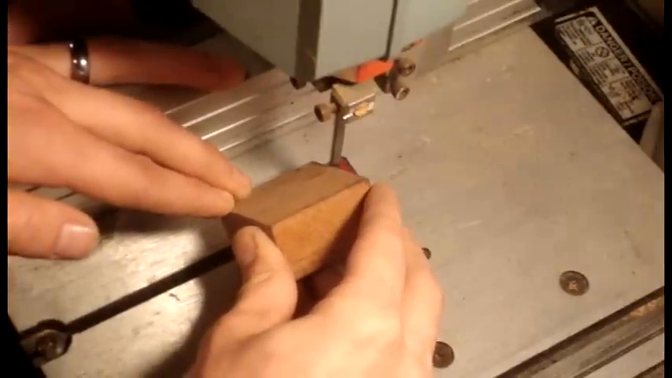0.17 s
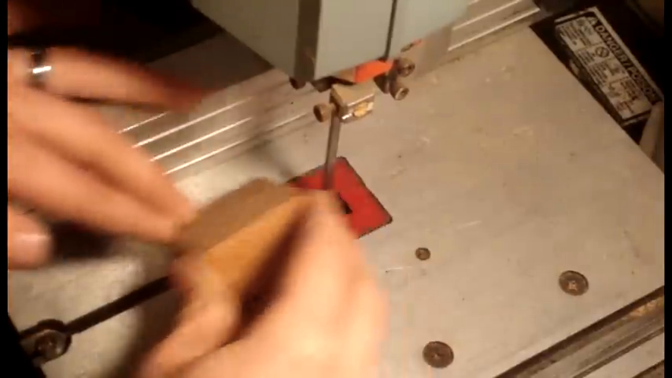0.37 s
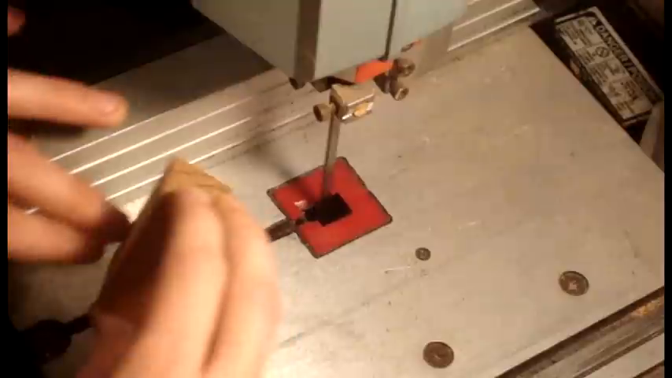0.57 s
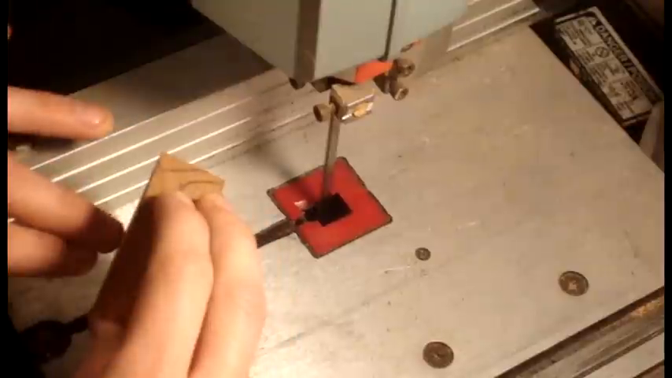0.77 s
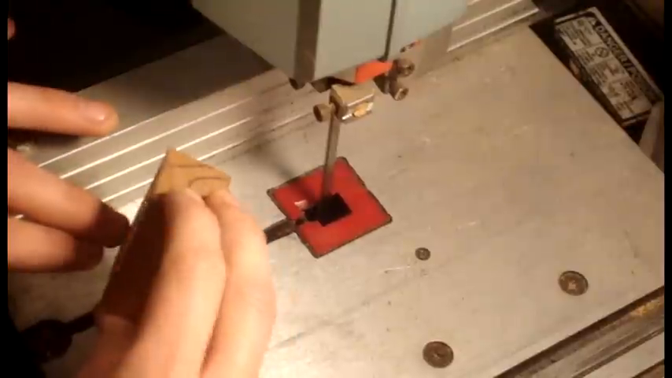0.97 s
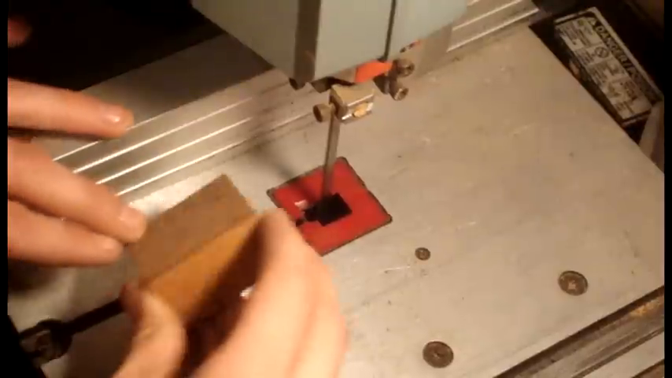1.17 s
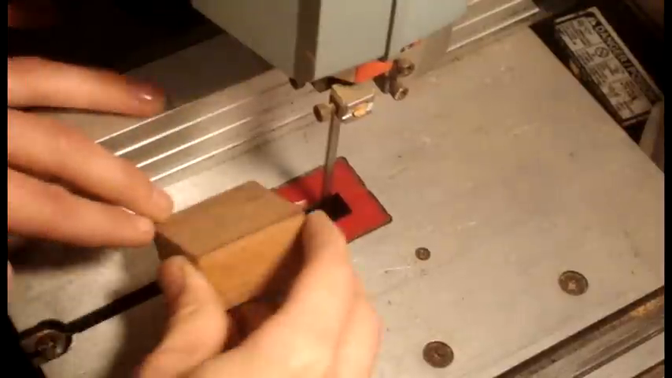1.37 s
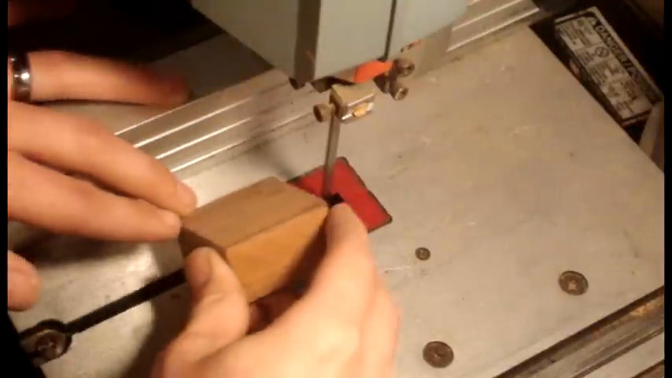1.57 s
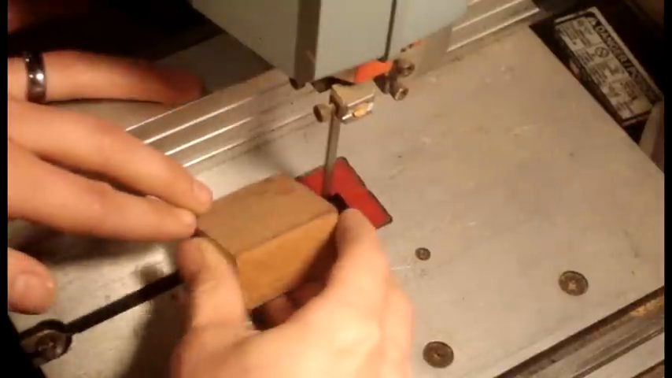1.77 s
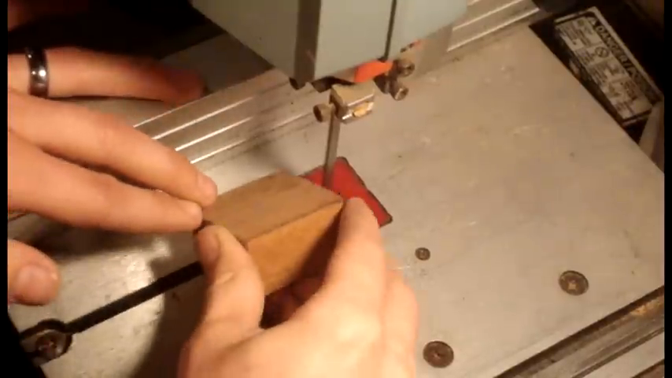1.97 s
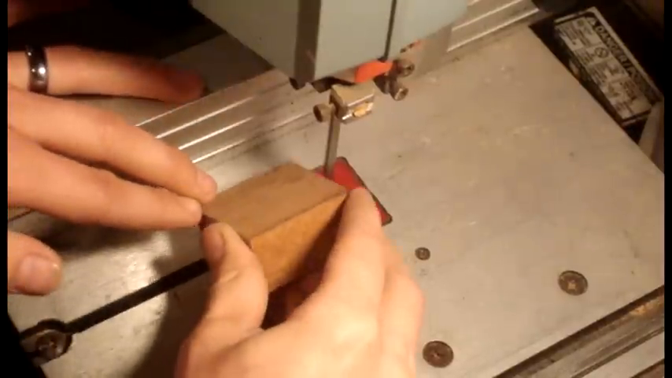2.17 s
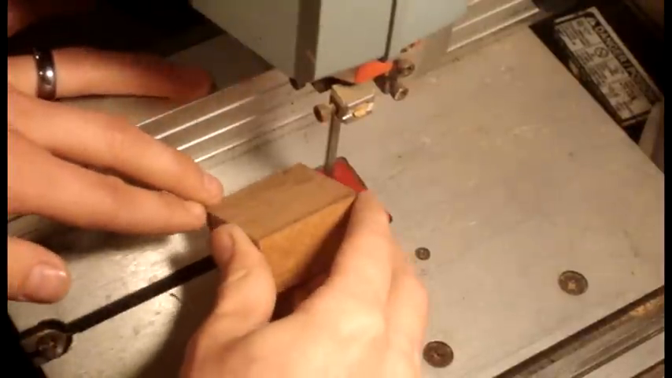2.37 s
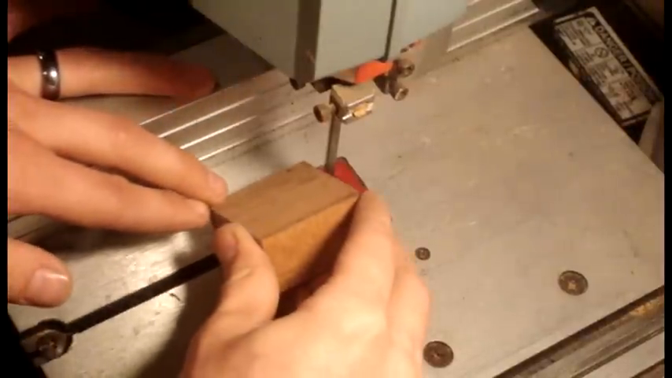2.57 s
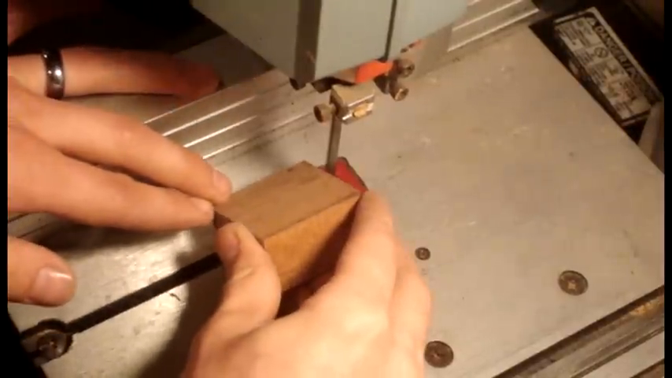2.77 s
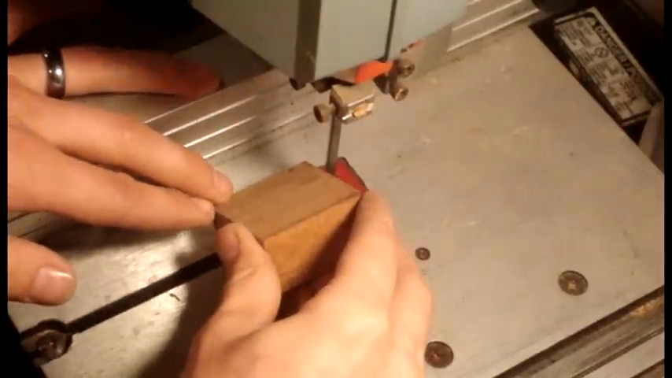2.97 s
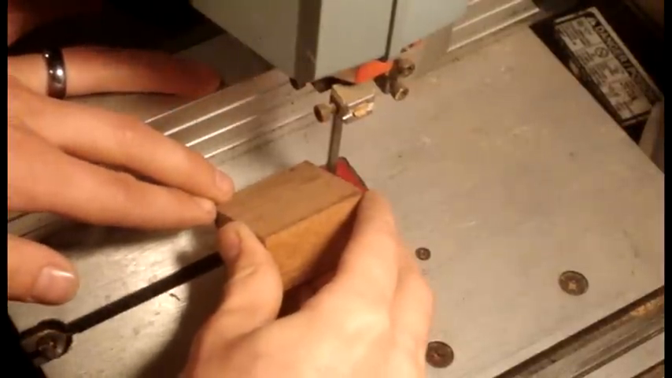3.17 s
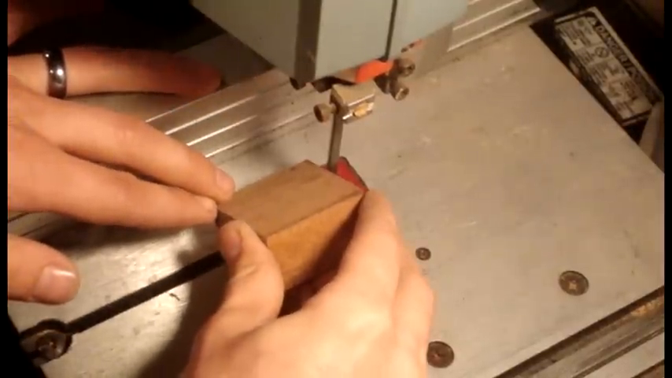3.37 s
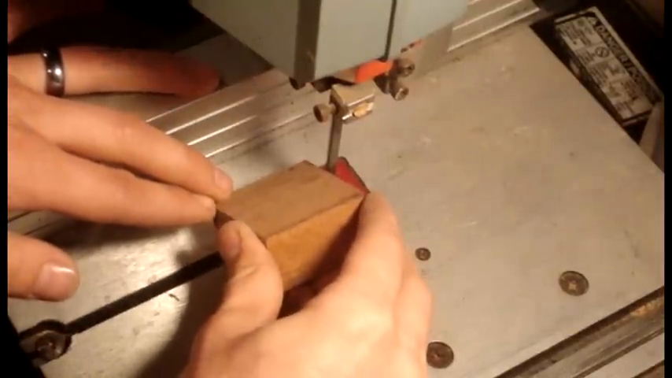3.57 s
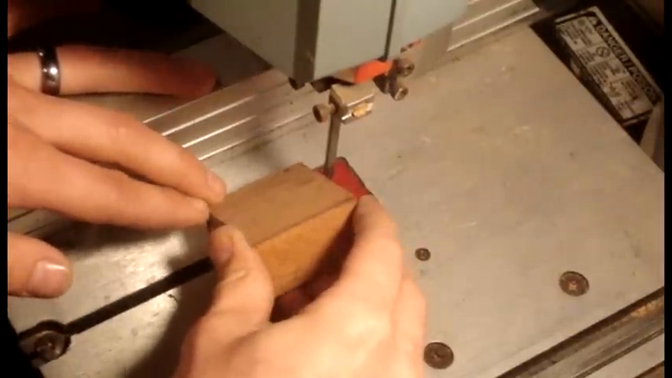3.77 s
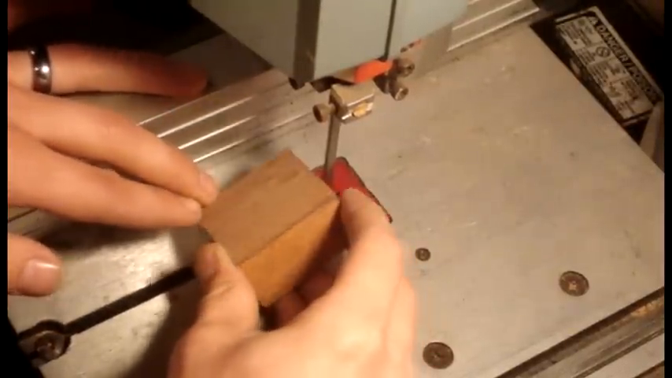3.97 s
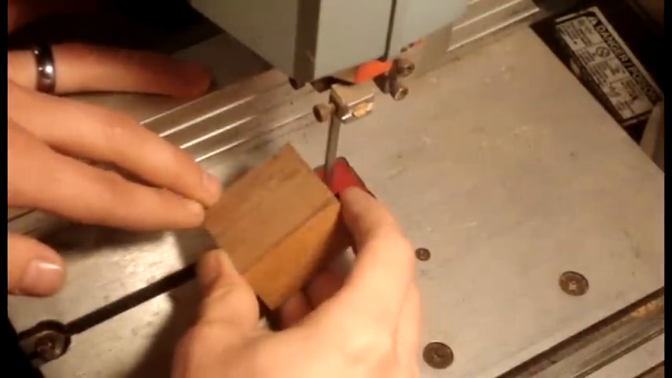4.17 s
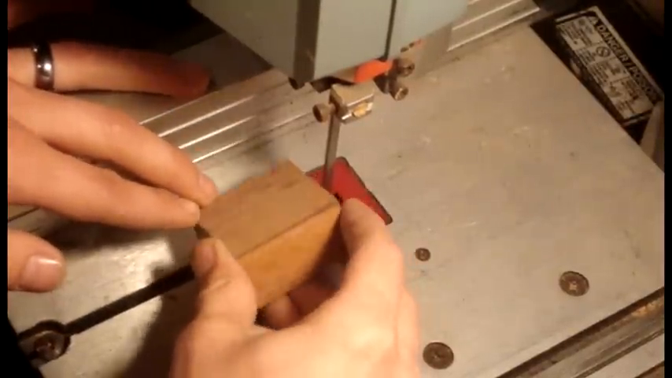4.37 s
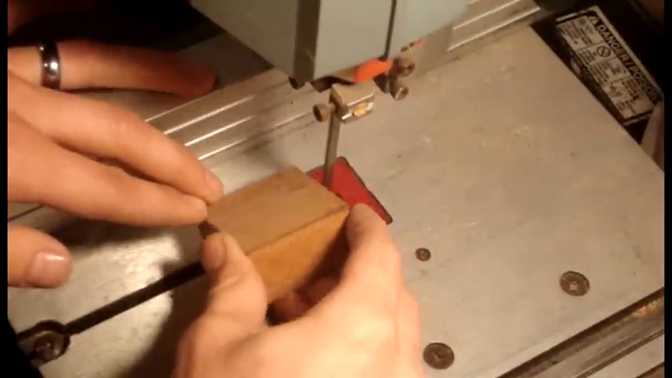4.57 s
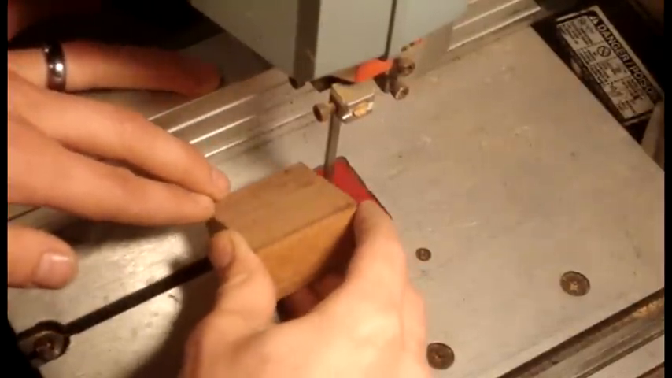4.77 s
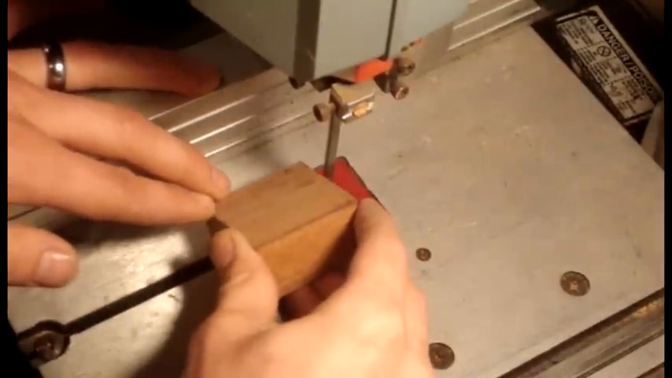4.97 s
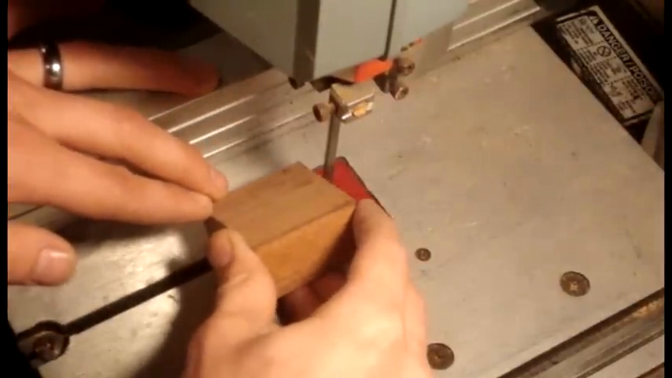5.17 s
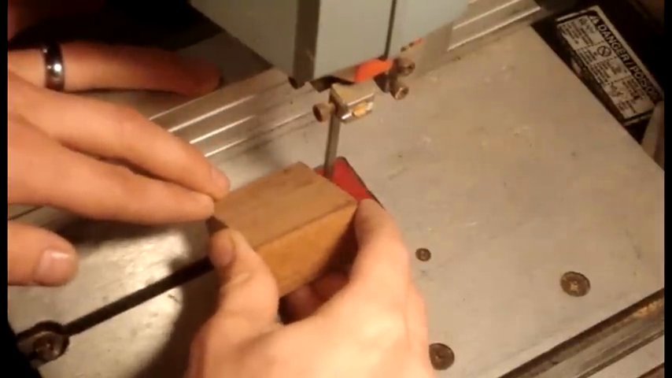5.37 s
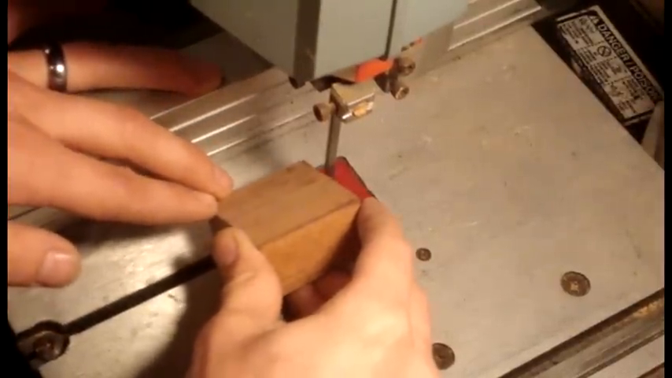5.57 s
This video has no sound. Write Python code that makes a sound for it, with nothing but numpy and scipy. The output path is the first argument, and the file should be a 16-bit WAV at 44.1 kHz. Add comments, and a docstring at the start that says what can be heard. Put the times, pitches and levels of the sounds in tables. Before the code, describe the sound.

A small bandsaw runs with a rattling whine, rasping and singing as it bites a wooden block in short cuts.

```python
"""Small bandsaw in a workshop.

Close up, on a mono camera microphone. The drive knocks once a turn and shakes the steel frame under
a whine of bearings and fan. Now and then the blade bites a wooden block: the teeth sing, the chips
rasp and the block rings. Between cuts the block knocks twice on the table."""
import sys
import numpy as np
from scipy import signal
from scipy.fft import rfft, irfft, next_fast_len
from scipy.io import wavfile
from scipy.ndimage import uniform_filter1d, map_coordinates

SR = 44100
rng = np.random.default_rng(int(sys.argv[2]) if len(sys.argv) > 2 else 0)


def put_to_file(sound):
    """Save the sound as 16-bit audio at rate SR, in the file named by the first command-line argument."""
    columns = np.atleast_2d(sound).T  # one column per channel
    safe = np.clip(columns, -1, 1)
    whole_steps = np.round(safe * 32767)
    wavfile.write(sys.argv[1], SR, whole_steps.astype(np.int16))


N = 248503
T = np.arange(N) / SR
TURN_HZ = 19.504  # turns of the drive a second


def amp(db):
    """Gain of a level in dB."""
    return 10 ** (np.asarray(db) / 20)


def unit(x):
    """x at rms 1."""
    return x / np.sqrt(np.mean(x ** 2) + 1e-20)


def along(points, hz):
    """(frequency, value) points interpolated on a log axis."""
    freqs, values = np.transpose(points)
    return np.interp(np.log(hz + 1), np.log(freqs + 1), values)


def curves(rows):
    """One value per sample for each column after the time."""
    times, *columns = np.transpose(rows)
    return np.array([np.interp(T, times, column) for column in columns])


def wobble(rate):
    """A smooth random curve, rate knots a second."""
    return map_coordinates(rng.standard_normal(int(N * rate / SR) + 4), [T * rate])


def pulse(at, db, again_db=0):
    """A gain that peaks once a turn, at a phase in turns; again_db adds a ripple twice a turn."""
    turn = 2 * np.pi * (TURN_HZ * T - at)
    return amp(db * np.cos(turn) + again_db * np.cos(2 * turn))


def swell(start, length):
    """A gain that rises, holds and fades; one starting at 0 s is already full."""
    edge_s = 0.13 * length
    rise = np.clip((T - start) / edge_s, 0, 1) if start > 0 else 1
    return rise * np.clip((start + length - T) / edge_s, 0, 1)


def filtered(x, response):
    """x through a filter given as gain against frequency."""
    size = next_fast_len(N + SR // 2)
    return irfft(rfft(x, size) * response(np.fft.rfftfreq(size, 1 / SR)), size)[..., :N]


def noise(response, patchy_db):
    """Filtered noise at rms 1, its gain varying in patches of time and frequency."""
    spectra = signal.stft(rng.standard_normal(N), nperseg=512)[2]
    patches = uniform_filter1d(rng.standard_normal(spectra.shape), size=5, axis=0)
    patches = uniform_filter1d(patches, size=8, axis=1)
    patchy = signal.istft(spectra * amp(patchy_db * unit(patches)), nperseg=512)[1][:N]
    return unit(filtered(patchy, response))


def peak(hz, half_width_hz, slope=2):
    """A response with a single peak."""
    return lambda f: 1 / (1 + ((f - hz) / half_width_hz) ** slope)


def idle_levels():
    """Rumble, frame and hiss in dB: the idling saw sounds lower around hard cuts and swells back."""
    # sinking of the idle sound: (time [s], level [dB])
    sinking = [(0, -15.5), (.3, -9.5), (.55, -8.5), (1.2, -3.5), (1.9, -2), (2.6, -1), (3.15, -1),
               (3.25, 0.5), (3.76, -5), (4.1, -2.5), (4.6, -1.5), (5.64, 0)]
    # rumble, frame and hiss: (base level [dB], depth of sinking [factor])
    parts = [(-40.5, 1.43), (-37.5, 1.06), (-42, 0.69)]
    # a hard push stills the frame's low ring: (start [s], length [s], level change [dB])
    stilled = (3.17, 0.55, -4.5)
    sink_db, = curves(sinking)
    rumble_db, frame_db, hiss_db = [db + depth * sink_db + 0.5 * wobble(7.9) for db, depth in parts]
    start, length, dip_db = stilled
    return rumble_db + dip_db * swell(start, length), frame_db, hiss_db


def frame_response(f):
    """Gain of the steel frame at f Hz: resonances over a broad bed."""
    # modes of frame, covers and table: (frequency [Hz], width [Hz], relative level [dB])
    modes = [(247, 55, -11.5), (335, 13, -6.5), (375, 26, -2.5), (566, 40, -9), (717, 23, -9.5),
             (853.5, 30, -8.5), (1034, 51, -6.5), (1243, 120, -12.5), (1460, 66, -11), (1540, 25, -11.5),
             (2536, 120, -10.5), (2785, 61, -7), (2985, 114, -11.5), (3842, 84, -14.5), (4836, 196, -15),
             (5330, 270, -25), (6136, 190, -21.5), (7630, 43, -20.5), (8300, 59, -20.5), (8680, 150, -20.5)]
    # broad noise between the modes: (frequency [Hz], relative density [dB])
    bed = [(18, -73), (30, -26), (281, -26.5), (358, 5.5), (445, -19), (1040, -13.5), (1150, -27.5),
           (1540, -3), (1960, -13.5), (2760, -1.5), (3350, -22.5), (4820, -17.5), (10000, -26),
           (13000, -45), (22000, -120)]
    bed_db = along(bed, f)
    mode_power = sum(amp(2 * db) * (f * width) ** 2 / ((hz * hz - f * f) ** 2 + (f * width) ** 2)
                     for hz, width, db in modes)
    return np.sqrt(amp(2 * (bed_db - 13)) + mode_power * amp(np.minimum(bed_db + 18, 0)))


def frame(rumble_db, frame_db, hiss_db):
    """Bearing and blade noise, pulsing with the turn, sets the frame's resonances going."""
    # pulsing of the frame's midrange: (from [Hz], to [Hz], depth [dB], phase [turns])
    beats = [(450, 790, .5, .5), (790, 930, 2.5, .89), (930, 1130, 2.8, .49), (1130, 1350, 1.2, .7),
             (1350, 1700, 1.6, .53), (1700, 2250, .6, .47)]

    def band(lo, hi, patchy_db):
        return noise(lambda f: frame_response(f) * (f >= lo) * (f < hi), patchy_db)

    knock = pulse(-.2, db=2.5)
    chatter = pulse(.4, db=2.2, again_db=1.4) * amp(.7 * wobble(14))
    middle = band(450, 2250, patchy_db=1.1)
    beating = sum(pulse(at, db) * filtered(middle, lambda f: (f >= lo) * (f < hi))
                  for lo, hi, db, at in beats)
    flecks = pulse(.2, db=.2, again_db=.4) * amp(.8 * wobble(25))
    return (amp(rumble_db - 3.5) * knock * band(0, 450, patchy_db=-1.0)
            + amp(frame_db + 2.5) * beating
            + amp(frame_db - 3.5) * chatter * band(2250, 3300, patchy_db=1.5)
            + amp(hiss_db + 2.5) * flecks * band(3285, SR, patchy_db=0.97))


def drive(rumble_db, frame_db):
    """Tones locked to the turn; neighbours line up into one knock a turn."""
    # tones of the drive: (multiple of the turn, relative level [dB])
    orders = [(5, -63), (6, -31), (7, -29), (9, -32), (11, -24), (12, -33.5), (13, -42), (18, -10),
              (19, -15), (20, -13.5), (22, -37), (24, -26.5), (26, -15.5), (28, -14.5), (29, -27),
              (30, -13), (33, -24), (35, -21), (39, -37), (44, -24.5), (50, -26), (51, -21), (52, -11),
              (53, -16), (54, -5.5), (56, -30), (60, -36.5), (61, -24), (62, -42.5), (64, -34), (71, -23),
              (76, -18), (77, -14), (81, -22), (82, -21)]
    # where on the turn each band knocks: (upper edge [Hz], phase [turns])
    knocks = [(450, -.2), (650, -.1), (1200, .5), (1800, .57)]
    out = np.zeros(N)
    for k, db in orders:
        base_db = rumble_db + 6.5 if k * TURN_HZ < 450 else frame_db + 6.0
        at = next(turn for top_hz, turn in knocks if k * TURN_HZ < top_hz)
        phase = 2 * np.pi * k * (TURN_HZ * T - at)
        out += amp(base_db + db + .6 * wobble(6)) * np.cos(phase + .13 * wobble(4))
    return out


def whine(frame_db):
    """Bearings and fan whine at set pitches, wavering a little."""
    # bearing and fan tones: (frequency [Hz], level against the frame [dB])
    whines = [(239, -17.5), (344.5, -12.5), (838, -12.5), (1249, -13), (1399, -9.5), (1438.5, -30),
              (1579, -10.5), (2465.5, -11), (2779, -9), (2823, -12)]
    return sum(amp(frame_db + db + 2.2 * wobble(9)) * np.cos(2 * np.pi * hz * T + 1.3 * wobble(8))
               for hz, db in whines)


def block_groan():
    """The block groans in a low, rough band under a hard push."""
    # groans: (start [s], length [s], relative level [dB])
    groans = [(0.0, 0.099, -31), (2.636, 0.027, -19), (2.75, 0.13, -23), (3.225, 0.17, -26)]
    push = sum(amp(db) * swell(start, length) for start, length, db in groans)
    return 0.13 * push * noise(peak(560, 35), patchy_db=1.5)


def block_knocks():
    """The block hits the table: a crack and a short wooden ring."""
    # knocks: (time [s], relative level [dB])
    taps = [(1.593, -16), (5.1524, -21)]
    # modes of the block: (frequency [Hz], relative level [dB], time to fall 60 dB [s])
    modes = [(1050, -4, .06), (1290, -1, .07), (1500, -4, .05), (1800, -3, .05), (2070, -1, .075),
             (2450, -12, .03)]
    out = np.zeros(N)
    t = T[:SR // 5]
    attack = 1 - np.exp(-t / 0.002)
    for start, tap_db in taps:
        ring = sum(amp(db + rng.normal(0, 1.1) - 60 * t / t60) * np.sin(2 * np.pi * hz * t)
                   for hz, db, t60 in modes)
        crack = 0.4 * amp(-60 * t / 0.0058) * rng.standard_normal(len(t))
        out[round(start * SR):][:len(t)] += amp(tap_db - 10.5) * (ring + crack) * attack
    return out


def ringing():
    """Block and blade ring in narrow, unsteady tones, alone or against each other."""
    # rings: (start [s], length [s], first pitch [Hz], last pitch [Hz], level [dB], roughness [rad])
    rings = [(0.0, .022, 1278, 1278, -33.5, .5), (.028, .085, 1275, 1283, -36, .7),
             (.117, .05, 1283, 1275, -33.5, .5), (.165, .085, 1285, 1290, -43, .9),
             (.232, .064, 880, 660, -38, 1.1), (.288, .035, 700, 640, -43, 1.1),
             (.43, .27, 3340, 3342, -54, .6), (.28, .19, 4660, 4640, -50, 1.1),
             (1.35, 1.15, 4885, 4900, -51, 1.4), (2.68, .38, 708, 710, -39.5, .7),
             (2.89, .26, 352, 352, -40, .3), (3.16, .08, 4800, 4950, -41, 1.8),
             (3.35, .14, 4750, 4900, -42, 1.8), (3.0, .15, 2790, 2790, -42, .6),
             (3.185, .05, 2790, 2790, -39, .5), (3.51, .07, 2790, 2785, -40, .5),
             (3.35, .08, 2085, 2085, -38, .5), (3.37, .09, 3465, 3460, -41, .6),
             (3.145, .045, 360, 355, -39, .3), (3.15, .08, 740, 735, -37, 1.2),
             (3.215, .145, 545, 570, -37.5, .8), (3.23, .105, 700, 755, -33, 1.2),
             (3.32, .12, 735, 720, -40, 1.1), (3.44, .12, 1315, 1325, -40, .9),
             (3.465, .08, 1035, 1050, -36, .7)]
    out = np.zeros(N)
    for start, length, first_hz, last_hz, db, rough in rings:
        hz = np.interp(T, [start, start + length], [first_hz, last_hz])
        phase = 2 * np.pi * np.cumsum(hz) / SR
        gain = np.sqrt(2) * swell(start, length) * amp(db + 1.5 * rough * wobble(40))
        out += gain * np.cos(phase + rough * wobble(90))
    return out


def contact():
    """Wood meets and leaves the blade: gains of rasp, pressure, sizzle and tooth harmonics 2-5."""
    # a list for each cut: (time [s], wood pressure [dB], thin rasp [dB], singing of the teeth [dB])
    cuts = [
        [(0, -43, -34, -40), (.03, -45, -35, -37.5), (.215, -46, -35, -37.5), (.228, -43.5, -33.5, -36),
         (.245, -43, -33, -46), (.31, -45.5, -37.5, -52), (.345, -48, -42.5, -58), (.45, -53, -44.5, -62),
         (.62, -58, -56, -66)],
        [(2.48, -56, -58.5, -57), (2.64, -46, -52, -44.5), (2.71, -40.5, -45, -40), (2.8, -48, -47.5, -45.5),
         (2.9, -47, -47, -45.5), (3.0, -46, -50, -44), (3.11, -46, -51, -44), (3.15, -42, -42, -43),
         (3.2, -43, -41.5, -39.5), (3.3, -41.5, -41.5, -38.5), (3.39, -44, -36, -34.5),
         (3.46, -40, -34.5, -38.5), (3.53, -43, -37, -38.5), (3.58, -50, -41, -48), (3.67, -47, -41.5, -43),
         (3.76, -45, -46.5, -65)],
        [(4.0, -60, -63, -62), (4.03, -59, -39.5, -74), (4.075, -46, -42, -60), (4.125, -51, -40.5, -54),
         (4.18, -41, -61, -45)],
        [(5.52, -61, -36, -66), (5.6, -44.5, -56, -48), (5.64, -45, -33, -44)],
    ]
    # colour of each cut: (sizzle against the rasp [dB], offsets of harmonics 2, 3, 4, 5 [dB])
    voices = [(-11, -8.5, -22, -8, 0.23), (-11.5, -12.5, -5.5, 2, -1.5), (-8.5, -15, -13, 8, .1),
              (-12, -1, -3, 6, -0.095)]
    # throb in each cut as the wheel runs out of true: (depth [dB])
    throbs = [6, 3.5, 3, 3]
    usual_db, slopes = -45.5, [0.93, 1.7, 0.36, 0.89]  # how steeply each harmonic follows the singing
    fade_s = .04
    gains = 0
    for cut, (sizzle_db, *offsets_db), throb_db in zip(cuts, voices, throbs):
        start, end = cut[0][0], cut[-1][0]
        meet = np.clip((T - start) / fade_s, 0, 1) if start > 0 else 1
        leave = np.clip((end - T) / fade_s, 0, 1) if end < 5.6 else 1  # the last cut runs on
        pressure_db, rasp_db, sing_db = curves(cut)
        tones_db = [usual_db + slope * (sing_db - usual_db) + db + wobble(9.3)
                    for slope, db in zip(slopes, offsets_db)]
        tone_gains = amp(tones_db) * pulse(.11, throb_db)
        noise_gains = amp([rasp_db, pressure_db, rasp_db + sizzle_db])
        gains += np.array([*noise_gains, *tone_gains]) * meet * leave
    return gains


def chips(rasp, pressure, sizzle):
    """Chips tear out in a thin rasp, a sizzle and a fuller rasp through the frame; the guide rings."""
    # thin rasp of the chips: (frequency [Hz], relative density [dB])
    thin_spectrum = [(3300, -66), (3700, -7), (3870, -9.5), (4100, -7), (4400, -7.5), (4860, -3),
                     (5290, -8.5), (6550, -9), (8110, -6), (9700, -18.5), (10300, -13), (13000, -66)]
    # full rasp of the chips: (frequency [Hz], relative density [dB])
    full_spectrum = [(240, -33), (450, -8.5), (715, -3), (1100, -6), (1900, -2), (2300, -3.5), (2800, -4.5),
                     (3300, -4.5), (4000, -3), (5500, -7), (7150, -47)]
    flicker = amp(0.1 * wobble(10))
    thin = noise(lambda f: amp(along(thin_spectrum, f)), patchy_db=3.0)
    treble = noise(peak(9700, 450, slope=4), patchy_db=1.0)
    guide = noise(peak(3880, 60), patchy_db=3.5)
    full = noise(lambda f: amp(along(full_spectrum, f)) * frame_response(f) ** 0.52, patchy_db=1.0)
    return (rasp * flicker * amp(0.5) * thin + sizzle * treble
            + pressure * (amp(-1.5) * guide + flicker * amp(8.5) * full))


def teeth(rasp, tone_gains):
    """Teeth strike the wood and sing in blurred harmonics; the blade slows under load."""
    # smear of tooth harmonics 2-5: (phase jitter [rad])
    blurs = [.4, .55, 1.0, .85]
    # upper tooth harmonics: (multiple of the tooth rate, relative level [dB])
    upper = [(7, -18), (8, -12), (9, -9), (10, -8.5)]
    tooth_hz, drag_hz, full_load_db = 698, 3.5, -35
    load = np.minimum(rasp / amp(full_load_db), 1)
    hz = (tooth_hz - drag_hz * load) * (1 + .0015 * wobble(25))
    phase = 2 * np.pi * np.cumsum(hz) / SR
    low = sum(np.sqrt(2) * gain * amp(wobble(30)) * np.cos(k * phase + blur * wobble(130))
              for k, gain, blur in zip(range(2, 6), tone_gains, blurs))
    high = sum(amp(db + 3 * wobble(22)) * np.cos(k * phase + 1.6 * wobble(90)) for k, db in upper)
    return low + tone_gains[-1] * high  # the upper harmonics follow the fifth


def scene():
    """The running saw and the work on the block; one close microphone feeds both channels."""
    rumble_db, frame_db, hiss_db = idle_levels()
    machine = drive(rumble_db, frame_db) + whine(frame_db) + frame(rumble_db, frame_db, hiss_db)
    rasp, pressure, sizzle, *tone_gains = contact()
    cutting = teeth(rasp, tone_gains) + chips(rasp, pressure, sizzle) + block_groan() + ringing()
    return np.tile(machine + cutting + block_knocks(), (2, 1))


def record(dry):
    """The camera microphone: the treble drops sharply near the top and ends at the band limit."""
    shelf_hz, top_hz = 10030, 10530
    return filtered(dry, lambda f: (amp(-22) + 1 / (1 + (f / shelf_hz) ** 200)) * (f < top_hz))


dry = scene()
out = record(dry)
put_to_file(out)
```